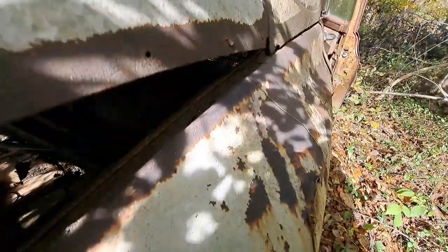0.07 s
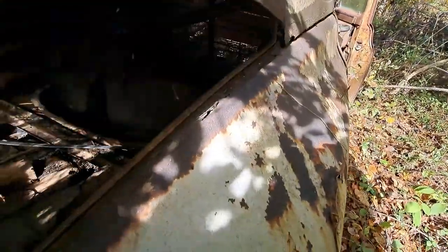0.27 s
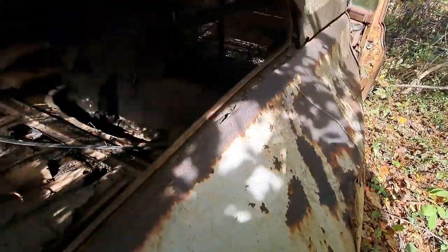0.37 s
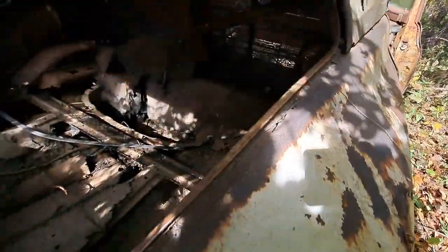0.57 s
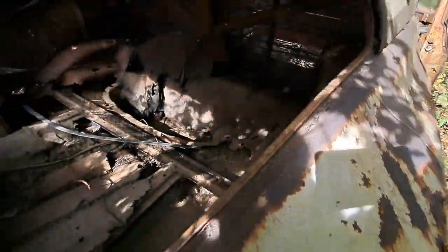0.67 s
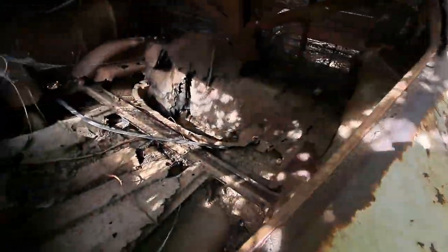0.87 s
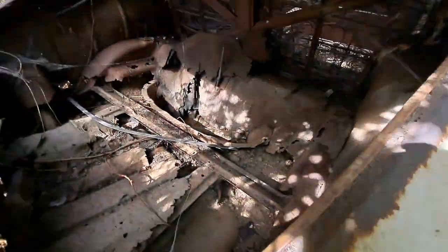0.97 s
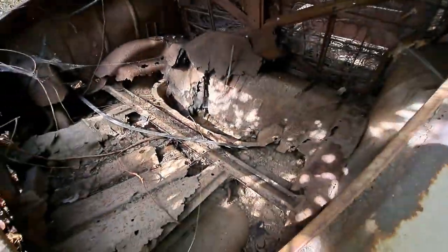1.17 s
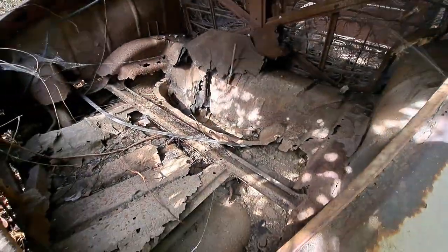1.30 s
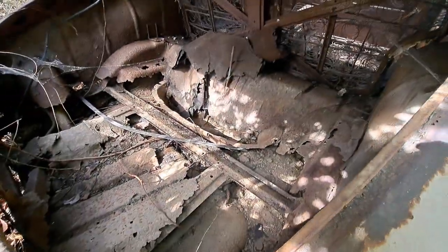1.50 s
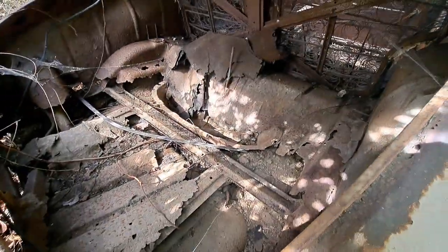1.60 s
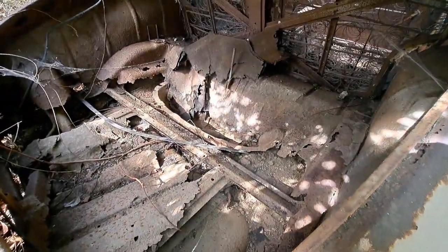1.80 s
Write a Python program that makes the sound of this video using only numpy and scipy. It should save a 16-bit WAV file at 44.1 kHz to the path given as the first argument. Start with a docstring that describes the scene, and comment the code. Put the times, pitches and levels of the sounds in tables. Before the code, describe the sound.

A rusty car boot lid scrapes open with grating metal, rattling flakes and a small clink

```python
"""The rusty boot lid of an abandoned car is dragged open outdoors: stick-slip clicks ring the panel's broad modes
and hiss above them, while a hinge rasps as a sliding band of noise. Knocks, trickling grit, flakes and ticks are
coloured noise bursts and grains; a small metal part drops with a clink of decaying modes. Low thumps are decaying
tones, wind noise buffets two spaced microphones, and a distant engine note throbs over faint traffic noise."""
import sys
import numpy as np
from scipy import signal
from scipy.fft import rfft, irfft, next_fast_len
from scipy.io import wavfile

SR = 44100
rng = np.random.default_rng(int(sys.argv[2]) if len(sys.argv) > 2 else 0)


def store_pcm(level_fs):
    """Save levels as 16-bit WAV."""
    pcm = np.round(np.clip(level_fs, -1, 1) * 32767).astype(np.int16)
    wavfile.write(sys.argv[1], SR, np.atleast_2d(pcm).T)


def volts_from_db(level):
    """Convert decibel levels to linear amplitude ratios."""
    exponent = np.asarray(level, float) / 20
    return 10 ** exponent


N = 81585   # length [samples]
LEFT_RIGHT = np.array([[0.5], [-0.5]])   # splits a left-over-right difference between the microphones
HEADROOM = 40   # silent samples before a burst, so that a microphone can hear it early
DRAG_LEAD_MS = 0.38   # the panel reaches the left microphone first
LEAD_MS_PER_DB = 0.05   # small impacts: left lead per dB of left pan


def rms_one(x):
    """Scale to rms 1."""
    return x / np.sqrt(np.mean(x ** 2) + 1e-20)


def in_time(rows):
    """Columns of a table joined by straight lines, per sample."""
    s, *columns = np.transpose(rows)
    return [np.interp(np.arange(N) / SR, s, c) for c in columns]


def colour(x, points):
    """Give x the spectral shape (frequency [Hz], level [dB]), with minimum phase so that nothing sounds early."""
    size = 4096
    hz, db = np.transpose(points)
    bins_hz = np.arange(size // 2 + 1) * SR / size
    log_gain = np.interp(np.log(bins_hz + 1), np.log(hz), db) * np.log(10) / 20
    # folding the cepstrum forward in time makes the phase minimum
    cepstrum = irfft(log_gain)
    cepstrum[1:size // 2] *= 2
    cepstrum[size // 2 + 1:] = 0
    pulse = irfft(np.exp(rfft(cepstrum)))
    pulse /= np.sqrt(np.sum(pulse ** 2))   # white noise keeps its level
    pulse = pulse.reshape((1,) * (np.ndim(x) - 1) + (-1,))
    return signal.fftconvolve(x, pulse, axes=-1)[..., :np.shape(x)[-1]]


def drift(rate_hz):
    """Random wander of rms 1: noise through two equal one-pole low-passes at rate_hz."""
    r = np.exp(-2 * np.pi * rate_hz / SR)
    noise = rng.standard_normal(N + SR)
    return rms_one(signal.lfilter([1], [1, -2 * r, r * r], noise)[SR:])


def peak(x, hz, width_hz):
    """A resonance of gain about 1."""
    r = np.exp(-np.pi * width_hz / SR)
    poles = [1, -2 * r * np.cos(2 * np.pi * hz / SR), r * r]
    return signal.lfilter([(1 - r * r) / 2, 0, (r * r - 1) / 2], poles, x)


def grains(per_s, spread_db):
    """Random clicks of either sign; spread_db scales their uneven sizes."""
    sizes = volts_from_db(spread_db * np.minimum(rng.exponential(1, N), 3))
    return sizes * rng.choice([-1, 1], N) * (rng.random(N) < per_s / SR)


def burst(t60, size, hold_s=0):
    """Three draws of noise that start sharply, hold and die away."""
    t = np.arange(size) / SR
    decay = volts_from_db(-60 * np.maximum(t - hold_s, 0) / t60)
    return np.pad(rng.standard_normal((3, size)) * decay, ((0, 0), (HEADROOM, 0)))


def place(x, lead_ms, pan_db, alike=1, other=0):
    """Two spaced microphones: lead and pan favour the left; the power share 1 - alike differs between them."""
    n = next_fast_len(len(x) + 64)
    cycles_per_sample = np.arange(n // 2 + 1) / n
    shift = np.exp(2j * np.pi * cycles_per_sample * SR * LEFT_RIGHT * lead_ms / 1000)
    shared = irfft(rfft(x, n) * shift, n)[:, :len(x)]
    return (np.sqrt(alike) * shared + np.sqrt(1 - alike) * other) * volts_from_db(LEFT_RIGHT * pan_db)


def add(out, x, s):
    """Mix x into out from time s."""
    i = int(s * SR)
    out[:, i:i + x.shape[1]] += x[:, :max(N - i, 0)]


# scraping strokes: (time [s], body level [dB], level of the 2-3.5 kHz part of the hiss [dB])
DRAG_STROKES = [(0.0, -45, -47), (0.018, -42.5, -51.5), (0.156, -49, -56), (0.172, -41.5, -50.5),
                (0.184, -49.5, -53.5), (0.352, -43, -49.5), (0.386, -38.5, -46.5), (0.442, -38.5, -42.5),
                (0.46, -31, -34.5), (0.512, -37.5, -44), (0.578, -29.5, -34), (0.592, -23.5, -33.5),
                (0.678, -29.5, -44.5), (0.688, -29, -43), (0.71, -31, -47), (0.764, -31, -37.5),
                (0.794, -36, -50.5), (0.822, -41, -50), (0.836, -31, -45.5), (0.976, -46.5, -52),
                (1.034, -47.5, -57), (1.15, -56, -55)]
# broad modes of the sheet: (frequency [Hz], half the width of each of two resonators in a row [Hz], level [dB])
PANEL_MODES = [(207, 40.8, -8), (341.4, 25.2, -6), (395, 38, -6.5), (474.4, 20, -1.5), (535.6, 35, -4),
               (700, 100, -3.5), (788.6, 25, -8.5), (852.5, 48, -1.5), (983, 33, -8.5), (1170, 38, -36.5)]
# colour of the rust friction: (frequency [Hz], relative level per Hz [dB])
FRICTION_COLOUR = [(700, -33), (1000, 3.5), (1230, 4.5), (1500, 1), (1900, -3), (2600, -5), (3300, -6.5),
                   (7700, -11.5), (9200, -21.5), (12900, -14.5), (16000, -18)]


def panel():
    """Stick-slip of rust on rust rings the sheet's broad modes and hisses above them."""
    body_db, hiss_db = in_time(DRAG_STROKES)
    after_s = np.maximum(np.arange(N) / SR - DRAG_STROKES[-1][0], 0)
    body_db = body_db - 20 * after_s   # both fade on after the last stroke, in dB per s
    hiss_db = hiss_db - 46.5 * after_s + 5   # the whole hiss is 5 dB over its 2-3.5 kHz part

    bodies = []
    for slips in [grains(900, 4) for _ in range(3)]:
        body = np.zeros(N)
        for k, (hz, half_width_hz, db) in enumerate(PANEL_MODES):
            mode = peak(peak(slips, hz, 2 * half_width_hz), hz, 2 * half_width_hz)
            body += volts_from_db(db) * (-1) ** k * mode
        bodies.append(rms_one(body))
    body = place(bodies[0], DRAG_LEAD_MS, 2.5, alike=0.86, other=np.array(bodies[1:]))

    rough = [0.85 * rms_one(grains(1900, 1.9)) + 0.5 * rng.standard_normal(N) for _ in range(3)]
    hiss = colour(rough, FRICTION_COLOUR) * volts_from_db(2.2 * drift(60))   # its level flickers
    # below 1500 Hz the microphones hear nearly the same hiss, above it mostly their own
    low = signal.sosfilt(signal.butter(4, 1500, "low", fs=SR, output="sos"), hiss)
    high = signal.sosfilt(signal.butter(4, 1500, "high", fs=SR, output="sos"), hiss)
    hiss = place(low[0], DRAG_LEAD_MS, 0.54, alike=0.88, other=low[1:])
    hiss = hiss + place(high[0], DRAG_LEAD_MS, 0.5, alike=0.15, other=high[1:])
    return volts_from_db(body_db + 1.5 * drift(18)) * body + volts_from_db(hiss_db) * hiss


# hinge rasp: (time [s], level of the thin line [dB], centre [Hz])
HINGE_RASP = [(0, -45.5, 1562), (.11, -52, 1610), (.15, -56.5, 1569), (.21, -56.5, 1583), (.3, -65, 1634),
              (.42, -52, 1647), (.7, -64, 1563), (.76, -52.5, 1540), (.88, -48, 1580), (.99, -48.5, 1575),
              (1.05, -60.5, 1593), (1.12, -53, 1626), (1.25, -60, 1684), (1.38, -65.5, 1660),
              (1.45, -82, 1613), (1.65, -69, 1580), (1.85, -93, 1590)]


def hinge():
    """A thin line of rough noise in a wider halo; both slide in pitch."""
    db, hz = in_time(HINGE_RASP)
    wander_hz = 20 * drift(9)
    phase = 2 * np.pi * np.cumsum(hz + wander_hz) / SR
    bands = []
    for _ in range(3):
        band = np.zeros(N)
        for spread_hz, part_db in ((45, 0), (190, 1.5)):   # line, halo
            band += volts_from_db(part_db) * (drift(spread_hz) * np.cos(phase) + drift(spread_hz) * np.sin(phase))
        bands.append(band)
    flutter_db = 2.5 * drift(28.8)
    return volts_from_db(db + flutter_db) * place(bands[0], -0.14, -6, alike=0.92, other=np.array(bands[1:]))


# dull knocks on the sheet: (time [s], level [dB], centre [Hz], t60 [s], pan to left [dB])
SHEET_KNOCKS = [(.165, -37.5, 1320, 0.057, 8.5), (.411, -38, 198, 0.037, 4), (.495, -42.5, 211, 0.11, -20),
                (0.755, -36, 1760, 0.098, 3), (1.328, -45, 356, 0.47, 1.5),
                (1.334, -45.5, 890, 0.14, -11.5)]


def knocks():
    """Soft contacts make the sheet answer in a broad band of decaying noise."""
    out = np.zeros((2, N))
    grid_hz = np.geomspace(50, 17000, 24)
    for s, db, hz, t60, pan_db in SHEET_KNOCKS:
        steepness = np.where(grid_hz < hz, 1.22, 1)   # the low side falls faster
        tone_db = -12 / 0.73 * np.abs(np.log2(grid_hz / hz)) * steepness
        x = colour(burst(t60, size=12000), np.c_[grid_hz, tone_db])
        add(out, volts_from_db(db) * place(x[0], DRAG_LEAD_MS, pan_db, 0.9, x[1:]), s - HEADROOM / SR)
    return out


# trickle of grit: (time [s], level [dB])
GRIT_FLOW = [(0.0, -47.5), (0.318, -46.5), (0.572, -50), (0.792, -46), (0.922, -44.5), (1.132, -53.5),
             (1.288, -56.5), (1.592, -64), (1.72, -59.5), (1.85, -72.5)]
# colour of the grit: (frequency [Hz], relative level per Hz [dB])
GRIT_COLOUR = [(1470, -41.5), (2500, -25), (3440, 3.5), (3890, -8), (5520, -3), (6450, -1.5), (8020, -1.5),
               (9810, -2.5), (12300, 1), (16000, 3)]


def trickle():
    """Fine grit runs off in clumps: dense clicks and noise at a wavering level."""
    db, = in_time(GRIT_FLOW)
    fine = []
    for _ in range(3):
        grit = grains(5000, 3) + 2.1 * rng.standard_normal(N)
        fine.append(rms_one(colour(grit, GRIT_COLOUR)))
    clumps_db = 2 * drift(31)
    return volts_from_db(db + clumps_db) * place(fine[0], 0.13, -0.4, alike=0.27, other=np.array(fine[1:]))


# flakes landing: (time [s], nominal peak level [dB], centre [Hz], t60 after a short hold [s], pan to left [dB])
FLAKE_HITS = [(0.1281, -41, 5540, 0.038, 0.5), (0.405, -35.5, 4920, 0.14, 4.5),
              (0.4524, -20.5, 13000, 0.034, 2.5), (0.7038, -33, 14900, 0.054, -5),
              (0.7299, -22, 11570, 0.061, 3), (0.7555, -22.5, 5340, 0.034, 0),
              (0.8285, -36, 7600, 0.17, -11), (0.995, -30, 12400, 0.043, -3),
              (1.1064, -40, 12040, 0.046, -6.5), (1.3364, -46.5, 5620, 0.038, -4.5),
              (1.49, -39.5, 13000, 0.049, 8.5), (1.5049, -39.5, 12400, 0.05, 7.5),
              (1.547, -26.5, 3620, 0.069, -1), (1.6362, -42.5, 7640, 0.091, 2),
              (1.6574, -42, 12100, 0.074, -1), (1.7191, -42, 7750, 0.064, -1.5)]
# colour common to the flakes: (frequency [Hz], relative level per Hz [dB])
FLAKE_COLOUR = [(1200, -30), (1600, -15), (2600, -16.5), (2950, -8.5), (5500, -4.5), (8400, -5.5),
                (9700, -7.5), (12900, 3), (15500, -15), (17000, -26)]
# sheet modes that the flakes ring: (frequency [Hz], relative level [dB], t60 [s])
SHEET_MODES = [(3042, -3, .04), (3235, -6, .04), (3833, -3, .03), (4150, -6, .04), (5136, -4, .03),
               (5588, -4, .03), (6799, -3, .035), (7375, -3, .03), (7924, -6, .035), (8387, -5, .03)]


def flakes():
    """Each flake is a sharp tick, ringing briefly in the hollow, with a colour of its own."""
    out = np.zeros((2, N))
    grid_hz = np.geomspace(1000, 17000, 48)
    colour_hz, colour_db = np.transpose(FLAKE_COLOUR)
    common_db = np.interp(np.log(grid_hz), np.log(colour_hz), colour_db)
    for s, db, hz, t60, pan_db in FLAKE_HITS:
        # a 10 dB hump, one octave in standard deviation, marks this flake
        tone_db = common_db + 10 * np.exp(-0.5 * np.log2(grid_hz / hz) ** 2)
        noise = burst(t60, size=6000, hold_s=0.11 * t60)
        snap = volts_from_db(7.5) * burst(0.008, size=6000)
        tick = colour(noise + snap, np.c_[grid_hz, tone_db])
        x = tick
        for mode_hz, mode_db, mode_t60 in SHEET_MODES:
            gain = volts_from_db(7 + mode_db + rng.normal(0, 3))
            x = x + gain * peak(tick, mode_hz, np.log(1000) / np.pi / mode_t60)
        stereo = place(x[0], LEAD_MS_PER_DB * pan_db, pan_db, 0.25, x[1:])
        add(out, volts_from_db(db - 11) * stereo, s - HEADROOM / SR)   # 11 dB: nominal peak over rms
    return out


# single grains ticking on the sheet: (time [s], nominal peak level [dB], centre [Hz], width [octaves],
# pan to left [dB])
GRIT_TICKS = [(0.512, -39, 12000, 1.2, -8), (0.8559, -25.5, 8200, 0.31, -5), (0.869, -30.5, 7540, 0.7, -8),
              (.889, -32.5, 9000, 0.57, -2.5), (0.9215, -34.5, 8060, 0.61, -12),
              (0.9424, -27, 5450, 0.39, 5.5), (1.034, -34.5, 11360, 0.29, 3.5),
              (1.078, -28, 5750, 0.82, 2.5), (1.126, -35, 12100, 0.21, 1), (1.1373, -35.5, 9000, 3.7, -0.5),
              (1.255, -43, 13500, .4, 8), (1.254, -48, 3620, 0.44, -1.5), (1.263, -25.5, 12300, 0.4, 6.5),
              (1.263, -39, 4500, 1.3, -1), (1.264, -34, 7750, 0.056, 7), (1.29, -33.5, 12100, 0.98, 5.5),
              (1.429, -61, 9000, 0.77, 3), (1.49, -36.5, 7000, .6, 6.5), (1.542, -50, 5070, 1, -0.5),
              (1.637, -46, 7750, 0.092, 4.5)]


def ticks():
    """Single grains of grit: a click in a band of its own with a 7 ms t60 and a faint longer tail."""
    out = np.zeros((2, N))
    grid_hz = np.geomspace(1000, 17000, 40)
    for s, db, hz, octaves, pan_db in GRIT_TICKS:
        tone_db = np.maximum(-12 * (np.log2(grid_hz / hz) / octaves) ** 2, -45)
        noise = burst(0.007, size=2000) + volts_from_db(-20) * burst(0.035, size=2000)
        x = colour(noise, np.c_[grid_hz, tone_db])
        stereo = place(x[0], LEAD_MS_PER_DB * pan_db, pan_db)
        add(out, volts_from_db(db - 2) * stereo, s - HEADROOM / SR)   # 2 dB: nominal peak over rms
    return out


# contacts of the metal part: (time [s], level [dB])
PART_CONTACTS = [(1.1718, -31), (1.1743, -27), (1.1757, -22)]
# pitches of the part's modes: (frequency [Hz])
PART_MODES_HZ = [2622, 3321, 3596, 3822, 4221, 4650, 5120, 5619, 5741, 6400, 7058, 7536, 7738, 8436, 8856,
                 9835, 10700, 11150, 11645, 12150, 12598, 12816, 13350, 13860, 14310, 14970, 15600]
# ringing of the same modes: (level over the contact [dB], t60 [s], pan to left [dB])
PART_RINGING = [(-26, 0.2, -8), (-22.5, 0.3, -4.5), (-33, 0.22, -6), (-23, 0.15, -6), (-16.5, 0.1, -5.5),
                (-29, 0.08, -4), (-28.5, 0.27, -5), (-15, 0.49, 5), (-18.5, 0.21, -19.5), (-25, 0.05, 2.5),
                (-12.5, 0.095, -4), (2.5, 0.076, -15), (-8, 0.085, -4), (-17, 0.08, -12), (-16, 0.099, -8),
                (-21, 0.16, -10), (-7.5, .05, -5), (-17, .06, 10), (-0.5, 0.037, -10), (-6, 0.05, 1),
                (-10, 0.052, 19), (-4, 0.064, 13), (-4.5, .06, 10.5), (-18, .07, 12.5), (-16, 0.22, -1),
                (-8, .09, 7), (-12, 0.069, 11)]
# colour of the crack: (frequency [Hz], relative level per Hz [dB])
CRACK_COLOUR = [(1470, -52), (2500, -43), (4780, -17.5), (5590, -14.5), (7490, -12), (8980, -15.5),
                (12700, -7), (16500, -18)]


def clink():
    """Three quick contacts ring the part's modes; a crack and a short tail in the hollow go with them."""
    lead_ms = -0.16   # the right microphone leads
    out = np.zeros((2, N))
    t = np.maximum(np.arange(SR + HEADROOM) - HEADROOM, 0) / SR
    t_ears = t + LEFT_RIGHT * lead_ms / 1000
    for s, db in PART_CONTACTS:
        ring = np.zeros((2, len(t)))
        for hz, (mode_db, t60, pan_db) in zip(PART_MODES_HZ, PART_RINGING):
            level_db = mode_db + rng.normal(0, 1.2) - 60 * t / t60 + LEFT_RIGHT * pan_db
            ring += volts_from_db(level_db) * np.sin(2 * np.pi * hz * t_ears)
        noise = volts_from_db(1.5) * burst(0.028, size=SR) + volts_from_db(-7) * burst(0.12, size=SR)   # crack, tail
        crack = colour(noise, CRACK_COLOUR)
        crack = place(crack[0], lead_ms, 2.5, 0.3, crack[1:])
        add(out, volts_from_db(db) * (ring * (t > 0) + crack), s - HEADROOM / SR)
    return out


# low thumps and dull knocks: (time [s], level [dB], frequency [Hz], t60 [s], pan to left [dB])
LOW_THUMPS = [(0.199, -27.5, 63, 0.19, 4), (0.379, -48, 50.5, 0.14, 9), (.497, -20, 190, .04, -6),
              (.513, -21.5, 181, 0.039, -12), (0.546, -33, 68.4, 0.075, -23),
              (0.617, -24, 65.7, 0.22, -7.5), (0.886, -32.5, 63.7, 0.14, 30)]


def thumps():
    """Each thump is a decaying low tone with a soft rise."""
    out = np.zeros((2, N))
    t = np.arange(SR // 2) / SR
    for s, db, hz, t60, pan_db in LOW_THUMPS:
        rise = 1 - np.exp(-t / 0.004)
        x = rise * volts_from_db(db - 60 * t / t60) * np.sin(2 * np.pi * hz * t)
        add(out, x * volts_from_db(LEFT_RIGHT * pan_db), s)
    return out


# wind on the microphones: (time [s], level [dB], pan to left [dB])
WIND_GUSTS = [(0, -52, -10), (.2, -45.5, 10.5), (.3, -41.5, -8.5), (.42, -34.5, -3), (.5, -36, -14),
              (.6, -34, 0), (.7, -43, 0), (.8, -50, -2), (.9, -33.5, 15.5), (1.0, -48.5, 4),
              (1.08, -46.5, 1.5), (1.14, -63, -13), (1.5, -70, .5), (1.85, -91, -7)]
# colour of the wind: (frequency [Hz], relative level per Hz [dB])
GUST_COLOUR = [(15, -39), (28, -10), (45, -9.5), (65, -4), (90, -11.5), (130, -7), (200, -25), (300, -31),
               (600, -73)]


def wind():
    """Low lumpy noise of turbulent air, its own at each microphone."""
    db, pan_db = in_time(WIND_GUSTS)
    low = colour(rng.standard_normal((2, N + 4096)), GUST_COLOUR)[:, 4096:]   # past the filter's start
    return volts_from_db(db + LEFT_RIGHT * pan_db) * low


# colour of the traffic: (frequency [Hz], relative level per Hz [dB])
TRAFFIC_COLOUR = [(25, -80.5), (55, 6), (90, 2), (130, 1), (200, -6), (260, -12.5), (500, -15.5),
                  (900, -10.5), (1150, -20.5), (1750, -25), (1950, -30.5), (3000, -37), (16000, -41.5)]


def distance():
    """A throbbing engine note over steady traffic noise, whose lows are shared by the microphones."""
    engine_hz, engine_db, waver_hz = 109.1, -49.5, 1.5
    throbs_per_s, throb_peak_s, throb_depth = 7.05, 1.235, 0.86
    t = np.arange(N) / SR
    throb = 1 + throb_depth * np.cos(2 * np.pi * throbs_per_s * (t - throb_peak_s))
    note = throb * np.sin(2 * np.pi * np.cumsum(engine_hz + waver_hz * drift(3)) / SR)

    noise = colour(rng.standard_normal((3, N + 4096)), TRAFFIC_COLOUR)[:, 4096:]
    low = signal.sosfilt(signal.butter(2, 710, fs=SR, output="sos"), noise)
    high = (noise[1:] - low[1:]) * volts_from_db([[-1.5], [1.5]])   # louder on the right
    traffic = high + place(low[0], 0.046, 0.2)
    return volts_from_db(engine_db) * note + volts_from_db(-50) * traffic


def scene():
    """All sources at the two microphones."""
    lid = panel() + hinge() + knocks()
    debris = trickle() + flakes() + ticks() + clink()
    return lid + debris + thumps() + wind() + distance()


def top_cut(x):
    """Nothing passes above the cut-off."""
    return signal.sosfilt(signal.butter(12, 16830, fs=SR, output="sos"), x)


def record(dry):
    """A steep low-pass cuts the top, 60 dB down from 16.7 kHz."""
    low_pass = signal.cheby2(12, 60, 16700, fs=SR, output="sos")
    mix = signal.sosfilt(low_pass, dry)
    return top_cut(mix)


dry = scene()
out = record(dry)
store_pcm(out)
```